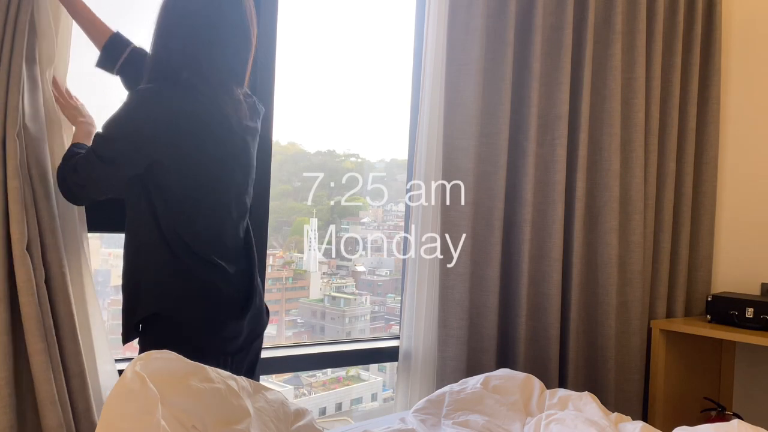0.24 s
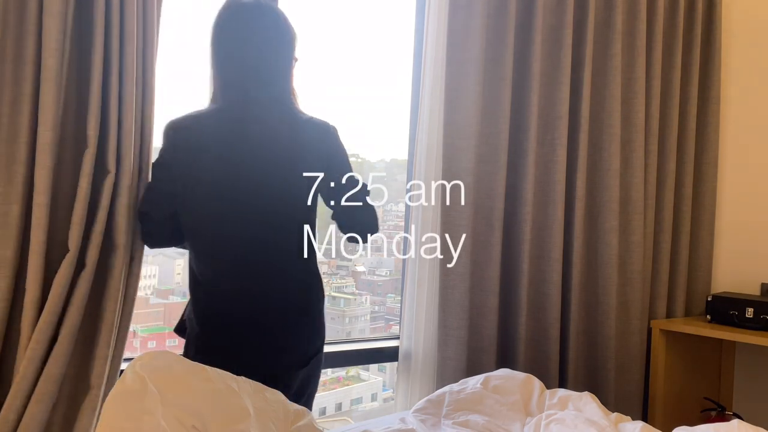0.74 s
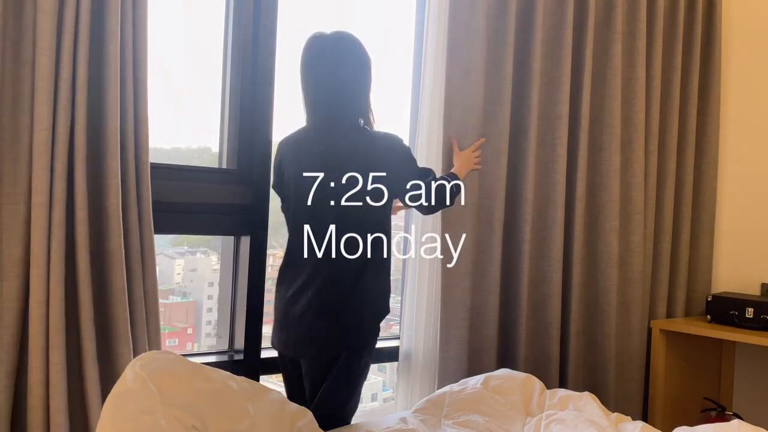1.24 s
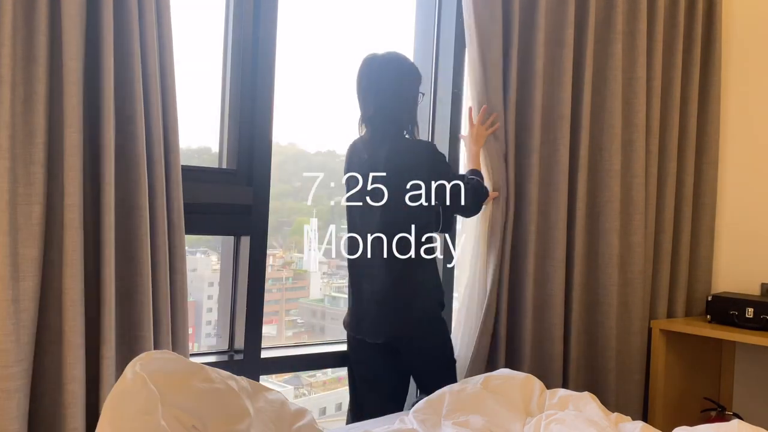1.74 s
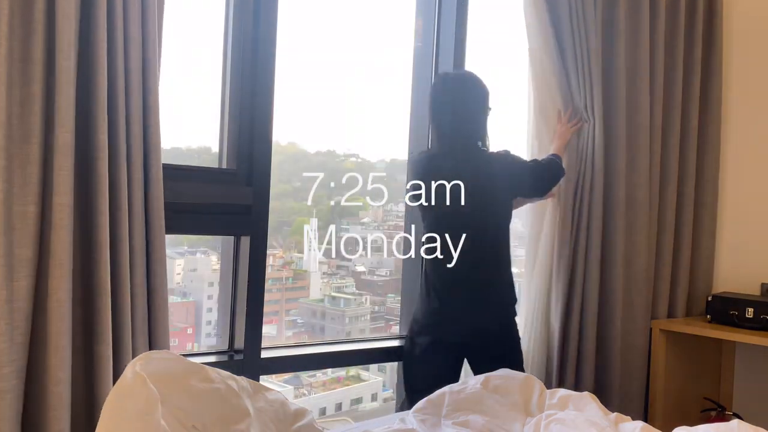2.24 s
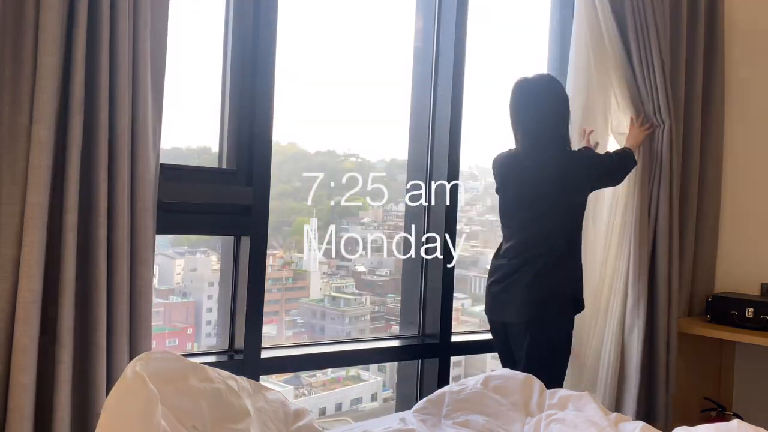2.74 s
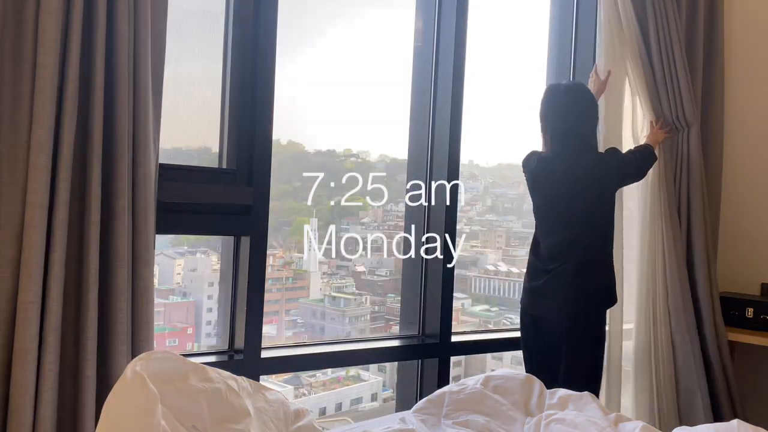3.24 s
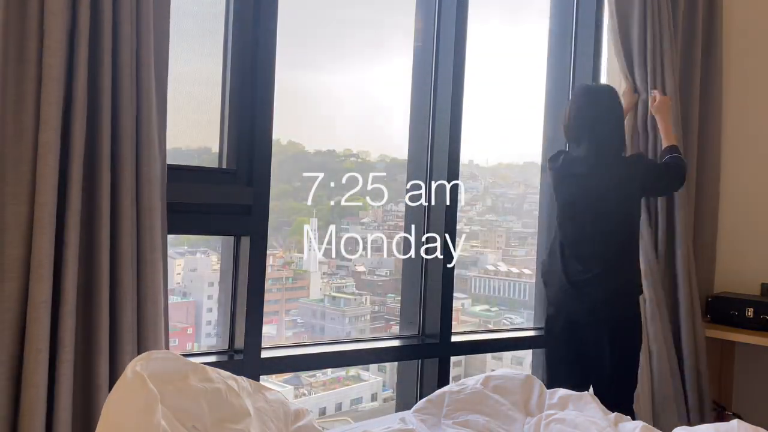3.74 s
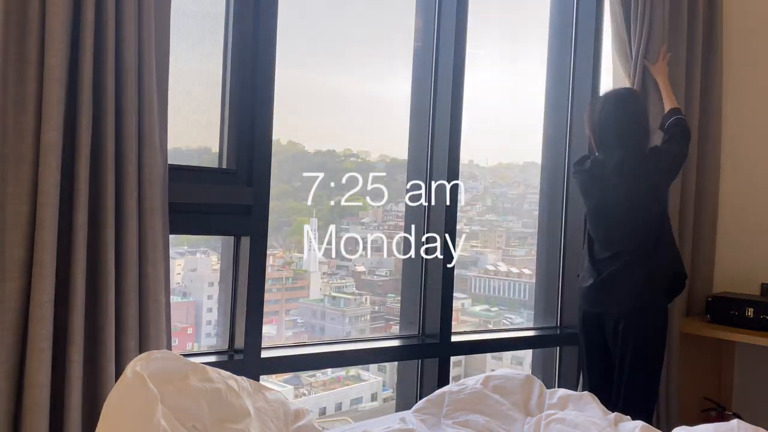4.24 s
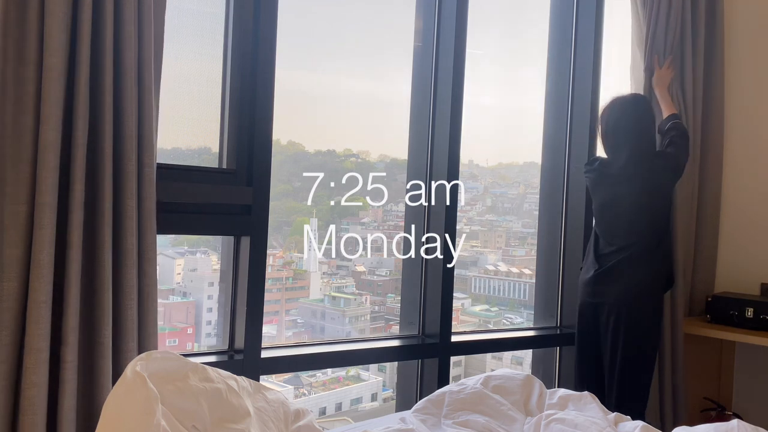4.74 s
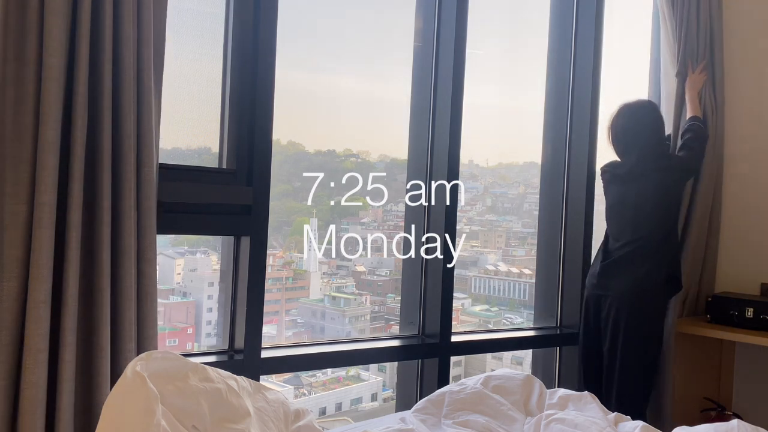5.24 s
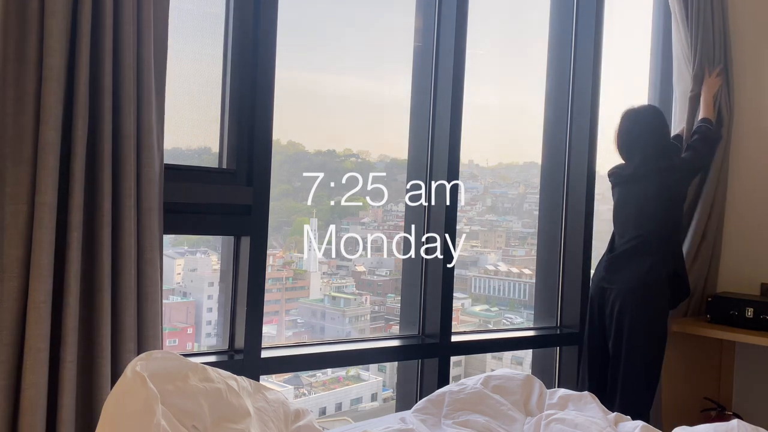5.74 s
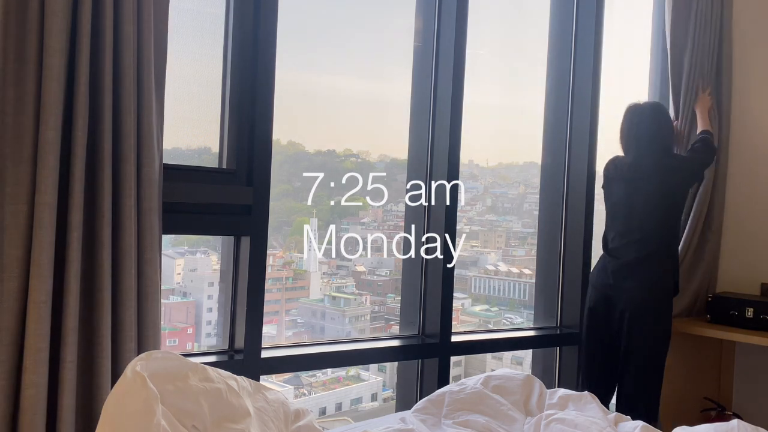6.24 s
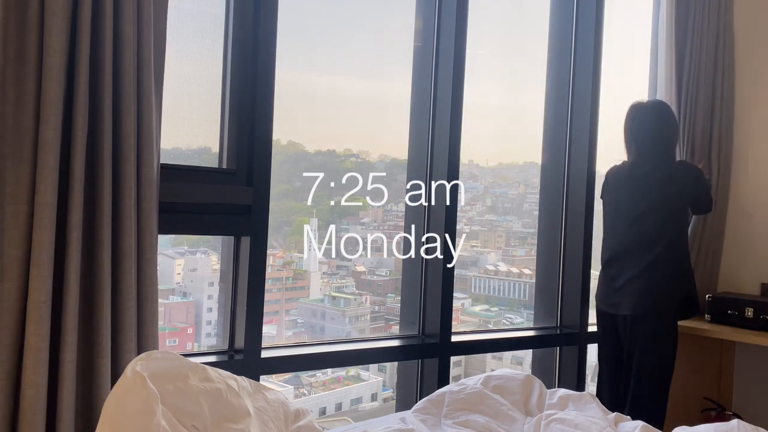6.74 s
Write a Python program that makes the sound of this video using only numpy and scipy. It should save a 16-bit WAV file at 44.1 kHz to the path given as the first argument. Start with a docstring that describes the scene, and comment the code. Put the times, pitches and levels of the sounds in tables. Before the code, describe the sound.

In a quiet carpeted bedroom, the tail of a cloth swish fades over low ventilation rumble. Faint rustling, a dull footfall and soft hand bumps follow. Then a heavy curtain is hauled along its rail, gliders rattling loudly for about a second with hard plastic clacks. After a quiet spell of rustling come two short rattling shoves, each ending in sharp clicks. Close stereo microphone, short room echo, source slightly right.

```python
"""The tail of a cloth swish over a low rumble comes first, then heavy curtains are drawn open by hand.
Plastic gliders, heard as random impacts in a resonant rail, rattle through one long pull and two short shoves;
filtered impulses make their knocks, and bursts of ringing noise the ticks of their hooks.
Shaped noise swishes and flaps as cloth; decaying sines are soft bumps and a footfall in the carpeted bedroom.
Low noise and wavering tones give the ventilation and distant town; random echoes give the room."""
import sys
import numpy as np
from scipy import signal
from scipy.fft import rfft, irfft, next_fast_len
from scipy.io import wavfile

SR = 44100
rng = np.random.default_rng(int(sys.argv[2]) if len(sys.argv) > 2 else 0)


def dump(signal):
    """Clip the signal to [-1, 1] and save it as 16-bit WAV at the path in sys.argv[1]."""
    limited = np.clip(np.atleast_2d(signal).T, -1, 1)
    pcm = np.round(limited * 32767).astype(np.int16)
    wavfile.write(sys.argv[1], SR, pcm)


N = 308567
TIME = np.arange(N) / SR

# spectrum of rail and gliders: (frequency [Hz], gain [dB])
RAIL_SPECTRUM = [(150, -14), (260, 1), (400, -3.5), (700, 0), (1000, -3.5), (1500, 0), (2800, -0.5),
                 (4000, -1), (5600, -6), (6900, -4), (8700, -20), (11000, -10), (12300, -17.5),
                 (13200, -34)]
# resonances of the hollow rail: (frequency [Hz], width [Hz], gain of the added ring [dB])
RAIL_RESONANCES = [(516.6, 12, 10.5), (2230, 90, -14), (2910, 790, -4)]
# spectrum of the metal hooks, rubbing or ticking: (frequency [Hz], gain [dB])
HOOK_SPECTRUM = [(500, -27), (3500, -24), (4700, -12.5), (5600, -23.5), (6400, 0), (7200, -4), (7800, -8.5),
                 (9000, -21), (11000, -19), (13500, -40)]


def gliders(level_db=2.0, judder_db=3.0, snag_db=1.24, hook_db=-13, waver_db=1.5):
    """Stick-slip and impact excitation: faster travel gives denser, louder, jerkier contacts in a hollow rail."""
    gain = pulling()
    speed = np.sqrt(gain / gain.max())
    contacts = grains(600 + 100 * speed, spread_db=4.2)
    jerks_db = judder_db * drift(110) + snag_db * drift(23.99)
    contacts = moving_in_room(contacts * from_db(speed * jerks_db), direct_db=-9.5, echo_db=-13.5)

    # the rail's ring wavers as the gliders travel, and the packed cloth damps it
    damped_db = np.interp(TIME, [4.75, 5.0], [0, -8])
    ringing = contacts
    for hz, width_hz, db in RAIL_RESONANCES:
        ring_gain = from_db(db + damped_db + waver_db * drift(7))
        ringing = ringing + ring_gain * resonance(contacts, hz, width_hz)
    rail = rms_one(colour(ringing, RAIL_SPECTRUM))

    # as the curtain bunches up, its hooks rub more against each other
    bunched_db = np.interp(TIME, [1.9, 2.8, 5.0], [-10, 0, 4])
    jiggles = grains(90 + 200 * speed, spread_db=1.5)
    jiggles = in_room(jiggles, room_response(direct_db=0.0, echo_db=-11.0))
    hooks = rms_one(colour(jiggles, HOOK_SPECTRUM)) * from_db(hook_db + bunched_db)
    return from_db(level_db) * gain * (rail + hooks)


# hauls along the rail: (start [s], length [s], relative level [dB], getting up to speed [s],
# growth [dB], stopping [s], run-on below the haul [dB], run-on decay [dB/s])
HAULS = [(1.908, 0.93, -44, 0.12, 3.5, 0.14, 6.5, 28), (4.412, 0.4, -45, 0.21, 6.5, 0.038, 4.5, 15),
         (5.683, 0.27, -44.5, 0.12, 8.5, 0.062, 22, 27)]


def pulling():
    """Inertia: each haul gets up to speed and grows, then the swinging cloth keeps a few gliders running on."""
    power = 0
    for s, length, db, attack_s, growth_db, stop_s, below_db, dying_db_per_s in HAULS:
        haul = stroke(s, length, attack_s, growth_db, stop_s)
        after = np.maximum(TIME - s - length, 0)
        run_on = (1 - np.exp(-after / stop_s)) * from_db(-below_db - dying_db_per_s * after)
        power = power + from_db(db) ** 2 * (haul ** 2 + run_on ** 2)
    return np.sqrt(power) * hush()


# gliders knocking together: (time [s], relative peak level [dB], hardness as contact cutoff [Hz],
# rattle decay [s], ring of the plastic [dB])
GLIDER_KNOCKS = [(0.248, -55, 5000, .004, -6), (0.334, -52, 3500, .003, 1), (1.483, -48.5, 5500, .003, 4),
                 (1.559, -46.5, 2490, 0.0066, 3), (1.721, -41, 9000, .006, -8),
                 (1.829, -45, 7000, .003, -5), (1.887, -36, 5050, .004, 3), (1.917, -32.5, 4770, 0.0097, 0),
                 (1.998, -36, 2380, 0.025, 3), (2.085, -42, 3500, 0.02, 3),
                 (2.174, -18.5, 13000, 0.0069, -0.5), (2.289, -25, 12000, 0.011, -22),
                 (2.453, -32, 8000, 0.016, -7), (2.667, -25.5, 11000, 0.0076, -8),
                 (2.748, -34, 4000, 0.01, -12), (2.878, -33, 13000, .003, -12),
                 (2.929, -32, 9000, 0.0062, -3), (3.781, -46.5, 2900, 0.0097, -1),
                 (3.798, -45.5, 2900, 0.011, -2), (4.014, -54, 3540, 0.0083, -6),
                 (4.795, -30.5, 8440, 0.0076, -5), (4.813, -30.5, 6960, 0.01, -11),
                 (5.775, -38, 5970, 0.0056, -8), (5.939, -26.5, 9000, .0057, -9)]
# resonances of gliders in their channel: (frequency [Hz], width [Hz], relative gain [dB])
GLIDER_RESONANCES = [(1364, 64, 9), (1730, 90, 4), (2200, 140, 4), (2846, 360, 0.5), (3284, 110, -0.5),
                     (4870, 280, -4), (6750, 300, 5)]
# spectrum of the knocks: (frequency [Hz], gain [dB])
KNOCK_SPECTRUM = [(200, -7.5), (700, -8), (1400, -2.5), (2300, 1), (3600, 1), (5000, 3), (5700, -3),
                  (6800, -0.5), (8700, -13), (11000, -1), (13500, -20.5)]


def knocks(level_db=2.5, rattle_db=-5, rattle_per_s=800, uneven_db=2.5):
    """Collision chain: one glider hits the next, rebounds rattle on, and each knock rings the plastic its own way."""
    out, t = np.zeros((2, N)), TIME[:SR // 8]
    for s, db, hard_hz, rattle_s, ring_db in GLIDER_KNOCKS:
        rebounds = rng.uniform(-1.68, 1, len(t)) * (rng.random(len(t)) < rattle_per_s / SR)
        force = from_db(rattle_db) * rebounds * np.exp(-t / rattle_s)
        force[0] += 1
        # a softer contact lasts longer and so excites less treble
        force = signal.lfilter(*signal.butter(2, hard_hz, fs=SR), force)
        ring = 0
        for hz, width_hz, mode_db in GLIDER_RESONANCES:
            ring_gain = from_db(ring_db + mode_db + uneven_db * rng.standard_normal())
            ring = ring + ring_gain * resonance(force, hz, width_hz)
        knock = colour(force + ring, KNOCK_SPECTRUM)
        add(out, s, db + level_db, in_room(knock, room_response(direct_db=-7.5, echo_db=-9.5)))
    return out


# hooks ticking in the glider eyes: (time [s], relative peak level [dB], ring of the lower mode [dB])
HOOK_TICKS = [(2.179, -21, 9), (2.6692, -23, -1), (2.884, -15, 12), (2.997, -26.5, 16), (4.552, -41, 2),
              (4.566, -33, 5), (4.762, -32, 0), (4.781, -35, 0), (4.799, -17.5, -2), (4.813, -13, -3),
              (5.131, -28, -6), (5.901, -28.5, 14), (5.939, -29, 6)]
HOOK_LOW_HZ, HOOK_LOW_WIDTH_HZ = 4800, 350


def ticks(level_db=-2.0, contact_s=0.00055):
    """Forced modal ringing: a hook snaps over in its eye, and a scrape of about a millisecond rings the wire."""
    out, t = np.zeros((2, N)), TIME[:SR // 50]
    for s, db, ring_db in HOOK_TICKS:
        force = rng.standard_normal(len(t)) * t * np.exp(-t / contact_s)
        force = force + from_db(ring_db) * resonance(force, HOOK_LOW_HZ, HOOK_LOW_WIDTH_HZ)
        tick = colour(force, HOOK_SPECTRUM)
        add(out, s, db + level_db, in_room(tick, room_response(direct_db=4, echo_db=-12)))
    return out


# spectrum of cloth on cloth: (frequency [Hz], gain [dB])
CLOTH_SPECTRUM = [(300, -8), (900, 3), (1400, 3), (2700, 2.5), (4500, -1), (6800, -4), (8500, -13),
                  (11000, -3), (12200, -7), (13000, -33.5)]
SHEEN_HZ = 4040  # above this lies the treble that each swish sets apart


def cloth(level_db=0.0, catch_db=-0.6):
    """Friction noise: threads catch and slip by the thousand, with body and treble following separate gains."""
    slips = grains(9000 * from_db(3 * drift(12)), spread_db=6.0) * from_db(catch_db * drift(25))
    swish = rms_one(colour(moving_in_room(slips, direct_db=-5.0, echo_db=-7.0), CLOTH_SPECTRUM))
    dull = signal.lfilter(*signal.butter(1, SHEEN_HZ, fs=SR), swish)
    body, treble = swishing()
    return from_db(level_db) * (body * dull + treble * (swish - dull))


# cloth, hands and sleeves sliding: (start [s], length [s], level [dB], release [s], treble over body [dB])
CLOTH_SWISHES = [(-0.04, 0.038, -51, 0.053, -4), (0.146, 0.17, -66, 0.21, 3),
                 (0.758, 0.22, -62.5, 0.036, 1), (1.204, 0.81, -66, 0.17, 2.5),
                 (1.954, 0.054, -47.5, 0.037, -31), (2.685, 0.083, -44.5, 0.02, 0.5),
                 (3.158, 0.16, -56.5, 0.11, -10), (3.453, 0.42, -65.5, 0.18, 0),
                 (4.148, 0.36, -68.5, 0.07, 5), (6.017, 0.39, -60, 0.42, -3),
                 (6.658, 0.23, -62, 0.025, -0.5)]
SWISH_ATTACK_S, SWISH_BUILD_DB = 0.037, 3.5
RUSTLE_DB, RUSTLE_SHEEN_DB = -76.5, -4.5  # faint rustle under the swishes; its treble over its body


def swishing():
    """Power addition of incoherent sources: separate swishes over a faint rustle, as body and treble gains."""
    body = from_db(RUSTLE_DB) ** 2
    treble = from_db(RUSTLE_DB + RUSTLE_SHEEN_DB) ** 2
    for s, length, db, release_s, sheen_db in CLOTH_SWISHES:
        gain = from_db(db) * stroke(s, length, SWISH_ATTACK_S, SWISH_BUILD_DB, release_s)
        body = body + gain ** 2
        treble = treble + (gain * from_db(sheen_db)) ** 2
    return np.sqrt(body) * hush(), np.sqrt(treble) * hush()


# a sleeve brushing the cloth: (start [s], length [s], level [dB], first pitch [Hz], last pitch [Hz])
SLEEVE_BRUSHES = [(0.869, 0.12, -65.5, 4790, 2590)]


def brushes(width_hz=900, release_s=0.013):
    """Thread-passing frequency: a sleeve zips over the weave, and its narrow hiss sinks as the arm slows."""
    out = 0
    for s, length, db, first_hz, last_hz in SLEEVE_BRUSHES:
        pitch_hz = np.interp(TIME, [s, s + length], [first_hz, last_hz])
        threads = narrow_noise(pitch_hz, width_hz)
        out = out + from_db(db) * threads * stroke(s, length, SWISH_ATTACK_S, SWISH_BUILD_DB, release_s)
    return in_room(out, room_response(direct_db=-1, echo_db=-4))


# hands bumping the frame through cloth: (time [s], relative peak level [dB], main pitch [Hz], pressing [s])
HAND_PATS = [(1.378, -60, 1230, 0.012), (1.418, -46, 892, 0.006), (1.458, -54.5, 737, 0.0074),
             (3.637, -59, 701, .008), (3.645, -53.5, 978, .006), (3.685, -64, 900, .006),
             (3.974, -61, 650, 0.0097), (6.975, -56.5, 760, 0.0015)]
# modes of the window frame behind the cloth: (multiple of the main pitch [ratio], level [dB])
WINDOW_FRAME_MODES = [(.38, -9.5), (.73, -6), (.9, -2), (1, -0.5), (1.31, -9), (1.58, -9), (2.33, -12.5),
                      (2.6, -21), (2.95, -25)]


def pats(level_db=6.5, waver_rad=0.75):
    """Inharmonic modes: a hand pushes cloth against the hollow window frame, giving a soft, pitched bump."""
    out, t = np.zeros((2, N)), TIME[:SR // 8]
    for s, db, pitch_hz, press_s in HAND_PATS:
        hollow = 0
        for multiple, mode_db in WINDOW_FRAME_MODES:
            phase = 2 * np.pi * (multiple * pitch_hz * t + rng.random()) + waver_rad * drift(260)[:len(t)]
            hollow = hollow + from_db(mode_db) * np.sin(phase)
        bump = hollow * t * np.exp(-t / press_s)
        add(out, s, db + level_db, in_room(bump, room_response(direct_db=0.5, echo_db=-12.5)))
    return out


# a heel on the floor: (time [s], relative peak level [dB])
HEEL_STEPS = [(0.454, -40)]
# modes of the floor under the foot: (frequency [Hz], level [dB], time to decay by 60 dB [s])
FLOOR_RESONANCES = [(56.8, -1, 1), (75, 7.5, 0.23), (110, 6, 0.16)]


def steps(level_db=-2.5):
    """Modal decay: a heel sets a few low modes of the carpeted floor booming."""
    out, t = np.zeros((2, N)), TIME[:SR]
    boom = 0
    for hz, db, t60 in FLOOR_RESONANCES:
        boom = boom + from_db(db) * np.sin(2 * np.pi * hz * t) * np.exp(-np.log(1000) * t / t60)
    soft_onset = 1 - np.exp(-t / 0.0083)
    for s, db in HEEL_STEPS:
        add(out, s, db + level_db, boom * soft_onset)
    return out


# heavy folds flapping with a dull puff of air; the last row is a dull low rush that comes up as the rustling
# stops: (start [s], length [s], level [dB])
FOLD_FLAPS = [(-0.04, 0.072, -58), (0.295, 0.12, -67), (1.85, 0.13, -55.5), (3.94, 0.044, -72),
              (4.172, 0.078, -64), (4.535, 0.36, -54.5), (5.375, 0.16, -63), (5.83, 0.11, -52),
              (6.785, 0.2, -59)]
# spectrum of air moved by the folds: (frequency [Hz], gain [dB])
FOLD_SPECTRUM = [(120, -4.5), (200, -2.5), (280, 3.5), (420, -6.5), (560, -1), (740, 2), (1000, -11.5),
                 (1500, -12.5), (2100, -29.5), (5000, -41), (13000, -47)]
# standing waves of the room: (frequency [Hz], width [Hz], gain of the added resonance [dB])
STANDING_WAVES = [(144, 16, 3), (169, 19, -1)]
# spectrum of the room's rumble: (frequency [Hz], gain [dB])
RUMBLE_SPECTRUM = [(20, -12), (36, -16), (47, -4), (54, -1), (68, -8), (95, -7.5), (150, -5.5), (215, -14),
                   (260, -14), (400, -28), (1000, -57.5), (5000, -82)]
FLAP_ATTACK_S, FLAP_RELEASE_S = 0.04, 0.075
# folds at rest, folds at the fastest pull, and the power by which they follow the pull
FOLDS_REST_DB, FOLDS_PULLED_DB, FOLDS_FOLLOW = -69.5, -58, 0.41
RUMBLE_DB, RUMBLE_PULLED_DB = -57, -62  # before the swell; added at the fastest pull


def low_air(flutter_db=2.0):
    """Air displacement: pulled or flapping folds push air with a dull flutter, over the rumble of the room."""
    pull = pulling()
    pull = pull / pull.max()
    flaps = 0
    for s, length, db in FOLD_FLAPS:
        flaps = flaps + from_db(db) * stroke(s, length, FLAP_ATTACK_S, 0, FLAP_RELEASE_S)
    swing = np.hypot(from_db(FOLDS_PULLED_DB) * pull ** FOLDS_FOLLOW, flaps)
    fold_gain = np.hypot(from_db(FOLDS_REST_DB), swing) * from_db(flutter_db * drift(9))

    air = diffuse(N)
    air = air + sum(from_db(db) * resonance(air, hz, width_hz) for hz, width_hz, db in STANDING_WAVES)
    folds = fold_gain * rms_one(colour(air, FOLD_SPECTRUM))

    rumble_gain = np.hypot(from_db(RUMBLE_DB) * bass_swell(share=0.64), from_db(RUMBLE_PULLED_DB) * pull)
    rumble = rumble_gain * rms_one(colour(diffuse(N), RUMBLE_SPECTRUM))
    return folds + rumble * from_db([[-.5], [.5]])  # left, right


# short, dull booms swelling out of the rumble: (start [s], length [s], relative level [dB], pitch [Hz])
LOW_BOOMS = [(1.96, 0.037, -56, 255), (2.572, 0.027, -52, 150), (3.22, 0.08, -60, 165),
             (3.316, 0.069, -56, 125), (4.169, 0.06, -57, 165), (5.486, 0.025, -52, 130),
             (6.12, 0.061, -59, 130)]


def booms(level_db=-0.5, width_hz=16, attack_s=0.028, release_s=0.035):
    """Narrow-band noise: at listed times the low end of the room booms softly around one pitch."""
    out = 0
    for s, length, db, hz in LOW_BOOMS:
        swell = stroke(s, length, attack_s, 0, release_s)
        out = out + from_db(db + level_db) * narrow_noise(hz, width_hz) * swell
    return out


# ventilation tones: (frequency [Hz], nominal rms level [dB])
VENTILATION_TONES = [(53.8, -59.5), (92, -70), (123.8, -72), (255, -78.5)]


def hum(waver_rad=0.73, swell_db=2.5):
    """Tonal machine noise: the ventilation drones with a few low tones, wavering in phase and level."""
    tones = 0
    for hz, db in VENTILATION_TONES:
        tone_gain = from_db(db + swell_db * drift(4.7))
        tones = tones + tone_gain * np.sin(2 * np.pi * hz * TIME + waver_rad * drift(5))
    return np.sqrt(2) * tones * bass_swell(share=1.15) * from_db([[-1], [1]])  # left, right


# course of the bass, of which only the departure from its mean counts: (time [s], level [dB])
BASS_COURSE = [(0.0, -50.5), (0.25, -61), (0.66, -58), (1.17, -62), (1.52, -54.5), (2.05, -54.5),
               (2.77, -53), (3.8, -62), (4.09, -57), (4.23, -56.5), (5.34, -57.5), (5.98, -55),
               (6.88, -59.5), (7.0, -52.5)]


def bass_swell(share):
    """Slow amplitude modulation: a share of the bass's rise and fall about its mean, as a gain."""
    db = np.interp(TIME, *np.transpose(BASS_COURSE))
    return from_db(share * (db - db.mean()))


HUSH_S, HUSH_FADE_S = 6.81, 0.006


def hush():
    """Exponential decay: the gain of gliders and rustling cloth falls away at one moment."""
    return np.exp(-np.maximum(TIME - HUSH_S, 0) / HUSH_FADE_S)


def stroke(start_s, length_s, attack_s, build_db, release_s):
    """Envelope of one movement: it sets in, grows to 1 at its end and dies away exponentially."""
    t = TIME - start_s
    attack = np.clip(t / max(min(attack_s, length_s), 1 / SR), 0, 1)
    build = from_db(build_db * (np.clip(t / length_s, 0, 1) - 1))
    return attack * build * np.exp(-np.maximum(t - length_s, 0) / release_s)


def grains(per_s, spread_db):
    """Shot noise: random tiny impacts of uneven size, with rms near 1 at any rate."""
    sizes_db = spread_db * np.minimum(rng.exponential(1, N), 4)
    sizes = rms_one(from_db(sizes_db)) * rng.choice([-1, 1], N)
    chance = np.clip(per_s / SR, 1e-4, 1)  # of an impact in each sample
    return sizes * (rng.random(N) < chance) / np.sqrt(chance)


def narrow_noise(hz, width_hz):
    """Ring modulation: slow noise times a sine makes a band around a pitch that may glide; rms 1."""
    phase = 2 * np.pi * np.cumsum(hz * np.ones(N)) / SR
    slow = signal.lfilter(*signal.butter(2, width_hz, fs=SR), rng.standard_normal(N))
    return rms_one(slow * np.sin(phase))


def drift(rate):
    """Random modulation: straight lines join random knots, rate of them a second; rms 1."""
    knots = rng.standard_normal(int(rate * N / SR) + 2)
    return rms_one(np.interp(TIME * rate, np.arange(len(knots)), knots))


def resonance(x, hz, width_hz):
    """Damped oscillator: a two-pole resonance with gain 1 on top."""
    r = np.exp(-np.pi * width_hz / SR)
    zeros = np.array([1, 0, -1]) * (1 - r * r) / 2
    poles = [1, -2 * r * np.cos(2 * np.pi * hz / SR), r * r]
    return signal.lfilter(zeros, poles, x + 1e-18)


def colour(x, spectrum, size=16384):
    """Minimum-phase filtering: folding the cepstrum gives a causal filter with the given spectrum."""
    cepstrum = irfft(np.log(from_db(at_hz(spectrum, np.fft.rfftfreq(size, 1 / SR)))))
    cepstrum[1:size // 2] *= 2
    cepstrum[size // 2 + 1:] = 0
    impulse = irfft(np.exp(rfft(cepstrum)))
    padded = next_fast_len(x.shape[-1] + size)
    return irfft(rfft(x, padded) * rfft(impulse, padded), padded)[..., :x.shape[-1]]


# likeness of the two ears for diffuse sound: (frequency [Hz], coherence [-1 to 1])
EAR_COHERENCE = [(50, 0.64), (130, 0.91), (260, 0.57), (500, -0.16), (1000, -0.12), (3000, 0.088),
                 (12000, 0.35)]


def diffuse(size):
    """Interaural coherence: mid and side noises mix so that the ears are alike as listed, mostly in the bass."""
    padded = next_fast_len(size)
    mid, side = rfft(rng.standard_normal((2, padded)))
    alike = np.clip(at_hz(EAR_COHERENCE, np.fft.rfftfreq(padded, 1 / SR)), -.99, .99)
    ears = np.sqrt(1 + alike) * mid + np.sqrt(1 - alike) * side * [[1], [-1]]
    return irfft(ears, padded)[:, :size]


# reverberation: (frequency [Hz], time to decay by 60 dB [s])
REVERBERATION = [(200, 0.34), (2000, 0.34), (6000, 0.22), (13000, 0.19)]
DIRECT_S, WINDOW_ECHO_S = (.00029, 0), (.0045, .00496)  # arrival at the left and right ear


def room_response(direct_db, echo_db):
    """Reverberation: a direct path from the right, a window echo on the left and a diffuse tail; energy 1."""
    t = TIME[:SR // 3]
    noise, tail = diffuse(len(t)), 0
    edges = [50, 700, 3000, 8000, 18000]  # bands [Hz], each with its own decay
    hz = np.fft.rfftfreq(len(t), 1 / SR)
    for low, high in zip(edges, edges[1:]):
        band = irfft(rfft(noise) * ((hz >= low) & (hz < high)), len(t))
        t60 = at_hz(REVERBERATION, np.sqrt(low * high))
        tail = tail + band * np.exp(-np.log(1000) * t / t60)
    response = rms_one(tail) / np.sqrt(len(t))
    response[[0, 1], [round(s * SR) for s in DIRECT_S]] += from_db(direct_db)
    response[[0, 1], [round(s * SR) for s in WINDOW_ECHO_S]] += from_db(echo_db)
    return response / np.sqrt(np.sum(response ** 2) / 2)


def in_room(x, response):
    """Convolution: a mono source as it reaches the two ears."""
    return signal.fftconvolve(x[None], response, axes=1)[:, :N]


def moving_in_room(x, direct_db, echo_db):
    """Time-varying reflections: a travelling source excites a new random pattern five times a second."""
    out, size = np.zeros((2, N + SR)), SR // 5
    for start in range(0, N, size):
        heard = in_room(x[start:start + size], room_response(direct_db, echo_db))
        out[:, start:start + heard.shape[1]] += heard
    return out[:, :N]


def add(out, s, peak_db, sound):
    """Superposition: place a sound at its time with the given peak."""
    start = max(round(s * SR), 0)
    out[:, start:start + sound.shape[-1]] += from_db(peak_db) * sound[..., :N - start] / np.abs(sound).max()


def from_db(db):
    """Level to amplitude: decibels to gain."""
    return np.exp(np.asarray(db) * np.log(10) / 20)


def rms_one(x):
    """Normalisation of power: scale to rms 1."""
    return x / np.sqrt(np.mean(x ** 2) + 1e-20)


def at_hz(points, hz):
    """Logarithmic frequency scale: read a table along it."""
    table = np.array(points)
    return np.interp(np.log(np.maximum(hz, 1)), np.log(table[:, 0]), table[:, 1])


def scene():
    """Superposition of rail, cloth, hands and foot over the low sound of the room."""
    curtain = gliders() + knocks() + ticks() + cloth()
    body = brushes() + pats() + steps()
    background = low_air() + booms() + hum()
    return curtain + body + background


CUTOFF_HZ = 15300


def record(dry):
    """Band limitation: an elliptic low-pass cuts the top steeply."""
    return signal.sosfilt(signal.ellip(10, .1, 80, CUTOFF_HZ, fs=SR, output="sos"), dry)


dry = scene()
out = record(dry)
dump(out)
```